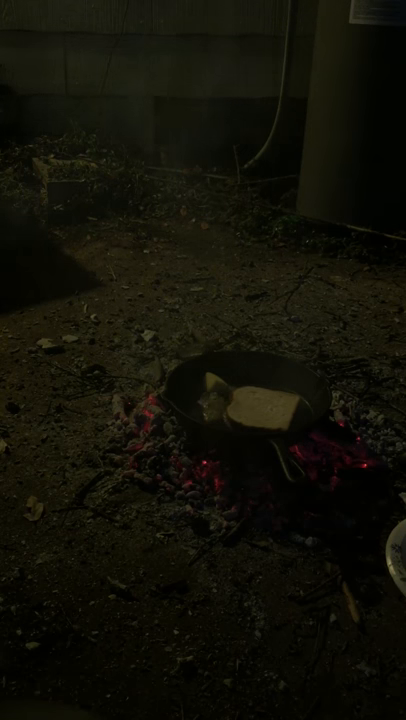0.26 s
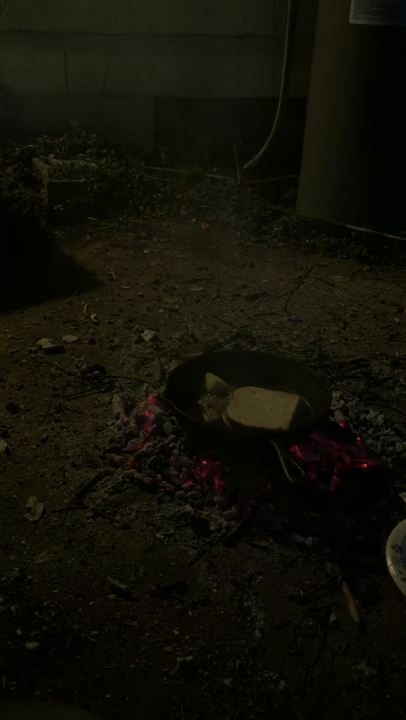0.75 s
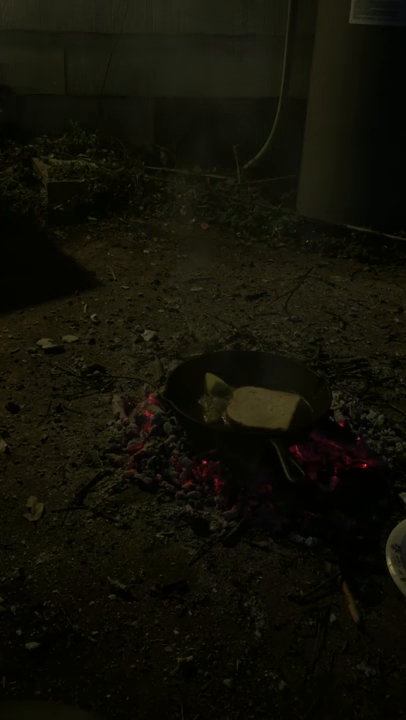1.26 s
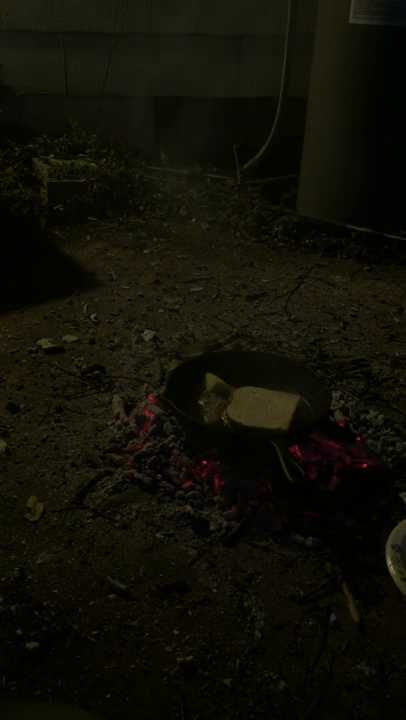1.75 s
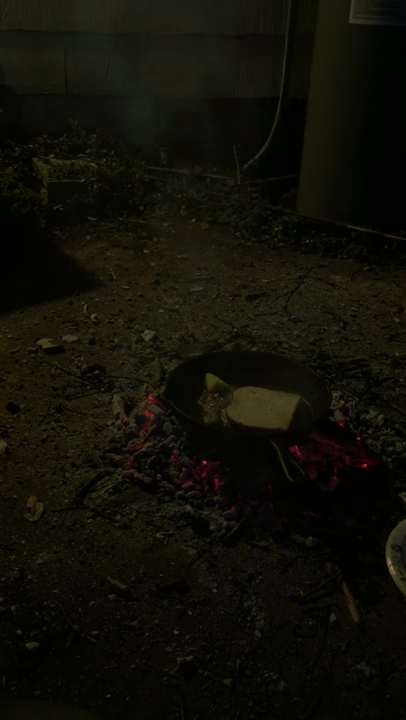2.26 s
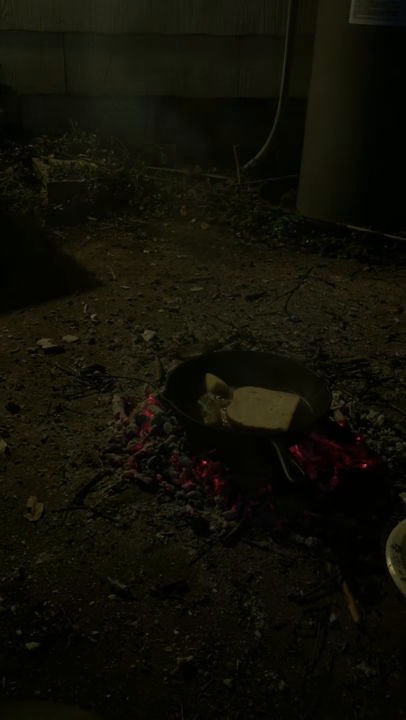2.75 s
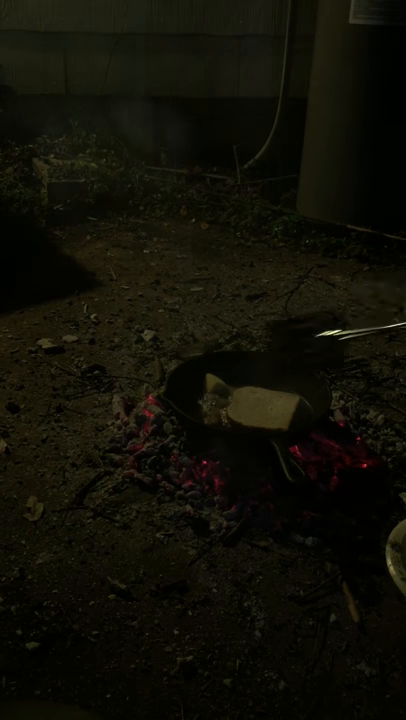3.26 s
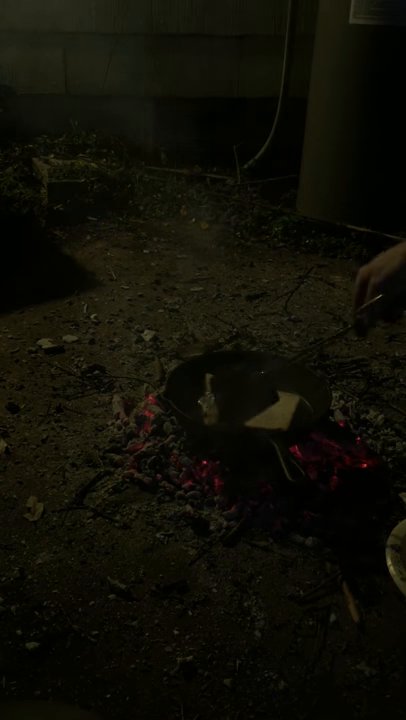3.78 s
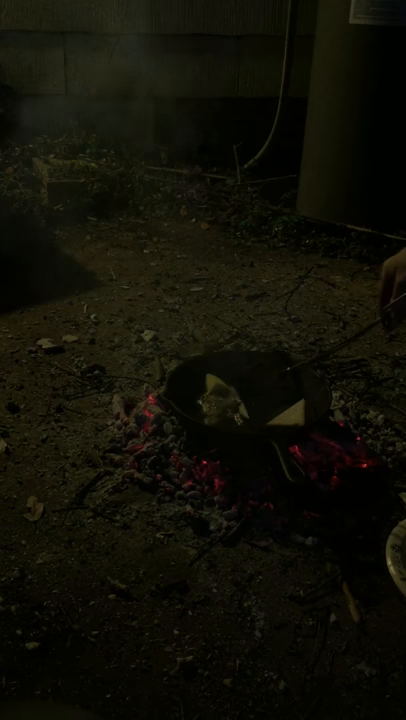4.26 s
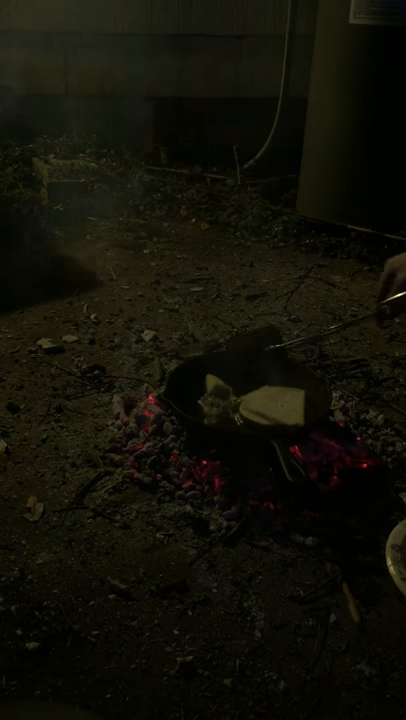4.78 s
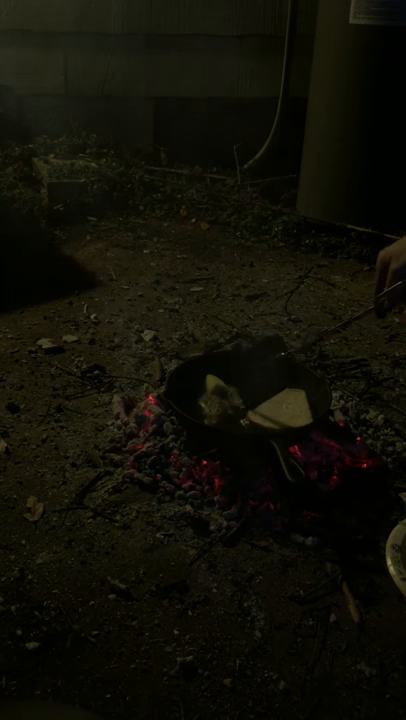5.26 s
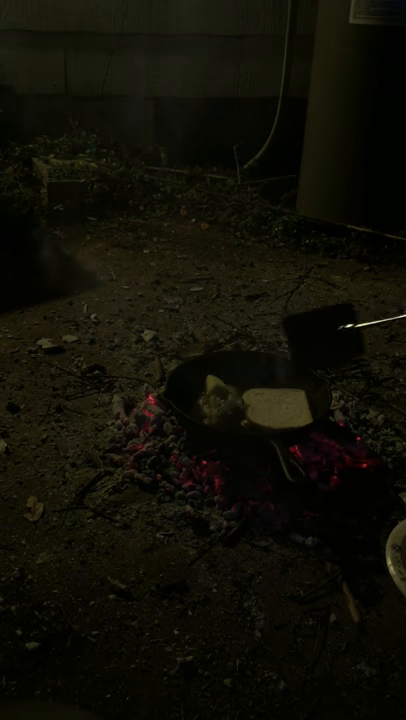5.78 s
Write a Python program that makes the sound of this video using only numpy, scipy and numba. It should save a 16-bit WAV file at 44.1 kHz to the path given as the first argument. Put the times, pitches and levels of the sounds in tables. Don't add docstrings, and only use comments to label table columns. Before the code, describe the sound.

Fat spits and sizzles outdoors at night while gravel shifts underfoot, a dry leaf cracks, then metal taps and scrapes the pan.

```python
import sys
import numpy as np
from scipy import signal
from scipy.fft import rfft, irfft
from scipy.io import wavfile
from scipy.ndimage import uniform_filter1d
from numba import njit

SR = 44100
rng = np.random.default_rng(int(sys.argv[2]) if len(sys.argv) > 2 else 0)


def put_to_file(sound):
    columns = np.atleast_2d(sound).T
    safe = np.clip(columns, -1, 1)
    whole_steps = np.round(safe * 32767)
    wavfile.write(sys.argv[1], SR, whole_steps.astype(np.int16))


def gain_from_decibels(decibels):
    exponent = np.asarray(decibels, float) / 20
    return 10 ** exponent


N = 265923

# start in seconds, peak in dB, pitch in Hz.
SNAPS = [(.272, -25, 8450), (.422, -17.5, 9100), (.5449, -22, 4150), (.9271, -11, 8600),
         (.9632, -19.5, 7740), (1.0582, -16.5, 7640), (1.204, -19, 7140), (1.287, -5, 6960),
         (1.6889, -19.5, 10600), (1.8268, -17, 4000), (2.0116, -21, 4900), (2.0196, -27, 4550),
         (2.0469, -20, 6600), (2.1505, -14, 8700), (2.2352, -16, 8900), (2.2604, -22, 4340),
         (2.3053, -13.5, 8050), (2.3175, -10.5, 5900), (2.3604, -22, 6550), (2.454, -16.5, 8100),
         (2.8943, -14, 7240), (3.127, -20, 7740), (3.4908, -25, 8700), (3.5402, -17.5, 9900),
         (3.5436, -21, 8400), (3.7317, -21.5, 7850), (4.574, -21, 7900), (5.5834, -20.5, 6670),
         (5.838, -15, 9190), (5.873, -23, 12000)]
# start in seconds, peak in dB, pitch in Hz.
POPS = [(.1108, -25.5, 9250), (.2081, -28, 12160), (.839, -20, 6240), (.8927, -27, 9730),
        (.966, -25.5, 11460), (1.0706, -19, 11000), (1.0809, -21, 11770), (1.217, -24, 8300),
        (1.2517, -21, 11500), (1.2768, -18, 8800), (1.2982, -21, 7650), (1.4491, -19.5, 11900),
        (1.5746, -20, 13500), (1.7946, -19, 7240), (2.11, -22, 6600), (2.1456, -24, 8100),
        (2.1805, -22.5, 6600), (2.1855, -24.5, 8800), (2.5533, -23.5, 8100), (2.686, -30, 9900),
        (2.7698, -28, 6300), (2.8634, -24, 6210), (3.2863, -25, 5900), (3.2906, -27, 5060),
        (3.9025, -27, 10000), (4.3179, -26, 10700), (5.1568, -20, 14400), (5.2436, -24.5, 10400),
        (5.7713, -18.5, 7300), (5.7987, -24, 8210)]
# start in seconds, peak in dB, pitch in Hz.
PINGS = [(.1274, -26, 11000), (.2782, -28, 11100), (.4705, -19.5, 9100), (.7415, -28.5, 9200),
         (1.003, -23.5, 9600), (1.0228, -26, 8800), (1.0276, -25, 5840), (1.6454, -32, 8100),
         (2.3227, -23, 9100), (2.4085, -25, 12000), (2.8289, -27, 7750), (2.8763, -25, 6230),
         (2.9467, -24, 10700), (2.9962, -25, 11800), (3.0422, -26, 9400), (3.1136, -22.5, 10000),
         (3.1456, -28, 8900), (3.1966, -23, 8950), (3.2945, -23, 8800), (3.3281, -26.5, 6100),
         (3.3413, -27, 9400), (3.3981, -26, 8800), (3.868, -26, 7440), (4.3229, -30.5, 8700),
         (4.687, -28.5, 8140), (5.0732, -27, 11500), (5.0829, -16.5, 11200), (5.444, -25, 10800),
         (5.5744, -26.5, 9400), (5.7835, -30, 8180)]
# start in seconds, peak in dB, pitch in Hz.
TICKS = [(.0375, -24, 11300), (.122, -29, 9550), (.241, -30, 4470), (.3545, -29, 9510), (.4545, -26, 7300),
         (.7008, -26, 11800), (.8505, -24, 8450), (1.258, -28, 7730), (1.3138, -25, 9980),
         (1.37, -27, 5300), (1.415, -27, 10000), (1.705, -25, 14050), (1.7545, -25.5, 9700),
         (2.1594, -28, 5930), (2.2215, -32, 9500), (2.3866, -24, 10110), (2.485, -27.5, 5130),
         (2.836, -22, 7940), (3.4113, -27, 5300), (3.6493, -26, 4980), (4.5368, -29, 12820),
         (4.554, -26, 8050), (4.6655, -25.5, 8800), (4.8271, -32, 3970), (4.9265, -24, 11500),
         (5.2611, -27, 7100), (5.5001, -28, 9860), (5.531, -27, 10360), (5.691, -22, 12690),
         (5.824, -23, 9720)]
# time in seconds, boil level in dB, fine spray re boil in dB.
BOIL = [(0.0, -60.5, -4), (.34, -57.5, -2), (.67, -64, -25), (1.01, -59.5, -11), (1.34, -55.5, -11),
        (1.68, -62.5, 6.5), (2.01, -56, -22), (2.68, -59.5, -29), (3.02, -55.5, -23), (3.35, -60.5, -10),
        (3.68, -60, -34), (4.1, -63.5, -15), (4.36, -63, 0), (4.62, -60.5, -4.5), (4.8, -62.5, -9),
        (5.08, -62.5, -7), (5.36, -60, 0), (6.03, -61, 2)]
# frequency in Hz, density in dB per Hz.
FIZZ_TONE = [(1200, -10.5), (2200, -7), (5000, 1), (9000, -2), (16000, -11.5)]
# time in seconds, pressure in dB, swell time in seconds,
# loose stones re pressure in dB, grind re pressure in dB.
STEPS = [(.2, -72, 0.23, 4, 13), (.42, -62.5, 0.22, -15, -5), (1.073, -48, 0.047, -7.5, -11),
         (1.23, -51, 0.096, -2.5, -2), (1.344, -43.5, 0.091, -2, -6.5), (1.44, -51.5, 0.042, 0, -12),
         (1.613, -45.5, 0.029, -18, -10), (1.782, -59.5, 0.068, 5, 11.5), (1.88, -46.5, 0.098, -1.5, -2.5),
         (1.95, -43, 0.095, -1.8, -4.5), (2.023, -37.5, 0.068, -6, -4), (2.17, -65.5, 0.17, 3.5, 6.5),
         (2.46, -55, 0.12, -9, -3), (2.55, -64.5, 0.096, 3, -7), (2.82, -56, .05, 2.5, 3.5),
         (2.871, -52, 0.068, 0, 1), (2.93, -55, 0.06, 5.5, -7), (3.17, -63, 0.088, -5, -8),
         (3.3, -59.5, 0.043, -12, -11)]
# start in seconds, peak in dB, pitch in Hz.
STONES = [(0.926, -52.5, 1600), (0.968, -48.5, 1560), (1.487, -48, 2700), (1.512, -46.5, 2820),
          (1.607, -44, 2500), (1.612, -41.5, 640), (1.612, -43, 2700), (1.615, -48, 2500),
          (1.622, -46, 2650), (1.78, -42, 1900), (1.811, -38, 2500), (1.828, -35, 1480), (1.833, -38, 2900),
          (1.937, -32, 1900), (1.938, -34, 3300), (2.021, -29.5, 3100), (2.16, -38.5, 2500),
          (2.262, -44, 1800), (2.794, -39.5, 2550), (2.865, -42.5, 1030), (3.621, -49, 2050),
          (4.573, -52, 2080), (4.894, -43.5, 3030), (5.081, -39, 2210), (5.26, -44.5, 2120)]
# frequency in Hz, density in dB per Hz.
LEAF_TONE = [(500, -36), (700, -25), (900, 6), (1200, -20), (1420, 4.5), (1780, -1.5), (2350, 8.5),
             (3300, -3), (8000, 0.5), (12500, 3), (16000, -6)]
# frequency in Hz, level in dB, 60 dB decay in seconds.
TAP_MODES = [(600, 4.5, 0.12), (770, 4.5, 0.1), (1380, 21, 0.092), (1600, -18, .03), (1800, -27, 0.031),
             (2148, 5.5, 0.23), (3640, -38, .1), (4360, -32, .1)]
# time in seconds, ring level in dB, hiss re ring in dB.
SCRAPE = [
    [(3.906, -43, -7), (3.935, -49.5, -2), (3.962, -42.5, -1.5), (3.99, -49, -2.5), (4.008, -51.5, 5),
     (4.03, -67, -11)],
    [(4.122, -60, -8), (4.135, -49.5, -20), (4.155, -49, -2), (4.185, -56.5, -3), (4.25, -71, -8)],
]
# frequency in Hz, width in Hz, level in dB.
PAN_RINGS = [(1430, 30, -7), (2140, 30, 0), (2445, 30, -3), (2600, 50, -8), (3150, 40, -10), (3750, 60, -8),
             (4290, 90, -10)]
# frequency in Hz, density in dB per Hz.
SCRAPE_TONE = [(240, -56), (400, -28), (1170, -17), (2120, -1), (2980, -6), (3710, -6), (5500, -37),
               (7150, -47), (12100, -120)]
# frequency in Hz, density in dB per Hz.
NIGHT = [(15, -83), (25, -8.5), (76, 0.5), (118, -4.5), (172, -18), (477, -29), (948, -26.5), (1730, -36),
         (2250, -28.5), (3670, -37), (4480, -37), (5000, -38.5), (6500, -37), (11000, -120)]
# frequency in Hz, gain in dB.
PORT = [(3700, -1), (4550, 4), (5600, -3), (7200, 3), (8050, -.5), (9000, 4), (10400, -5), (11600, 2),
        (12600, 1.5), (14400, -4), (15500, 1.5)]

SNAP_CYCLES, POP_CYCLES, PING_CYCLES = 0.64, 1.2, 2.2
LONE_RE_BOIL_DB, CLUSTER_DB, SEETHE_DB = -2.2, 2.5, 2.2
RELEASE_PER_SWELL = 1.085
LEAF_S, LEAF_DB, LEAF_ATTACK_S = 2.711, -29, 0.0029
LEAF_SPENT_S, LEAF_BEND = 0.042, 1.4
TAP_S, TAP_DB = 3.9062, -21.5
RUMBLE_DB, AIR_DB = -51.5, -51.5


def unit(x):
    return x / np.sqrt(np.mean(x ** 2))


def colour(x, points):
    hz, db = np.transpose(points)
    f_hz = np.maximum(np.fft.rfftfreq(N, 1 / SR), 1)
    gain = gain_from_decibels(np.interp(np.log(f_hz), np.log(hz), db))
    return unit(irfft(rfft(x) * gain, N))


def band(x, lo_hz, hi_hz):
    edges_hz = [lo_hz, min(hi_hz, .45 * SR)]
    sos = signal.butter(2, edges_hz, "bandpass", fs=SR, output="sos")
    return unit(signal.sosfilt(sos, x))


def curves(tables):
    t, out = np.arange(N) / SR, 0
    for table in tables:
        s, *columns = np.transpose(table)
        inside = (t >= s[0]) & (t < s[-1])
        out = out + inside * np.array([np.interp(t, s, c) for c in columns] + [t * 0 + 1])
    silence_db = 200 * (1 - out[-1])
    return np.vstack([out[:1] - silence_db, out[1:-1]])


@njit
def grains(s, size, hz, cycles, swell):
    y = np.zeros(N)
    for k in range(len(s)):
        i = int(s[k] * SR)
        p = np.exp((2j * np.pi - 1 / cycles[k]) * hz[k] / SR)
        q = np.exp(-hz[k] / SR / swell)
        z, lack = size[k] * p ** (i + 1 - s[k] * SR), q
        while abs(z) > .003 * abs(size[k]) and i < N - 1:
            i += 1
            y[i] += z.imag * (1 - lack) ** 2
            z *= p
            lack *= q
    return y


def scatter(count, spread_db, lo_hz, hi_hz, cycles):
    u = rng.random((count, 4)).T
    size = gain_from_decibels(-spread_db * np.log(1 - .99 * u[1])) * np.sign(u[3] - .5)
    hz = lo_hz * (hi_hz / lo_hz) ** u[2]
    ring_cycles = cycles * (.3 + 2.8 * abs(u[3] - .5))
    return unit(grains(u[0] * N / SR, size, hz, ring_cycles, .6))


def walk(rate_hz):
    k = int(SR / rate_hz)
    held = np.repeat(rng.standard_normal(N // k + 1), k)
    return 1.2 * uniform_filter1d(held, k)[:N]


def resonate(x, hz, t60_s):
    p = np.exp(2j * np.pi * hz / SR - np.log(1000) / (t60_s * SR))
    return signal.lfilter([1], [1, -p], x).imag


def yard(near):
    t = np.arange(2000) / SR
    tail = rng.standard_normal(len(t)) * gain_from_decibels(-60 * t / 0.011) * (t > .0011)
    return near + gain_from_decibels(-18.5) * signal.fftconvolve(near, tail)[:N]


def butter():
    kinds = (SNAPS, SNAP_CYCLES), (POPS, POP_CYCLES), (PINGS, PING_CYCLES), (TICKS, POP_CYCLES)
    s, db, hz, cycles = np.transpose([(*row, ring) for table, ring in kinds for row in table])
    sign = np.sign(rng.standard_normal(len(s)))
    pops = grains(s - .00015, sign * gain_from_decibels(db + 3.5), hz, cycles, .5)
    boil_db, spray_db = curves([BOIL])

    small = scatter(count=7000, spread_db=2.5, lo_hz=2500, hi_hz=13000, cycles=2.0)
    hiss = gain_from_decibels(1.5 * walk(25)) * rng.standard_normal(N)
    spectrum = rfft(small + gain_from_decibels(-7) * hiss)
    white = irfft(spectrum / uniform_filter1d(abs(spectrum), size=9000), N)
    carpet = colour(white, FIZZ_TONE)

    lone = scatter(count=520, spread_db=2.0, lo_hz=7200, hi_hz=12500, cycles=4.0)
    lone = lone * gain_from_decibels(LONE_RE_BOIL_DB + CLUSTER_DB * walk(13))

    mist = scatter(count=3000, spread_db=3.5, lo_hz=10000, hi_hz=16000, cycles=3.0)
    spray = band(mist + gain_from_decibels(-9) * hiss, 10500, 16500)
    fine = gain_from_decibels(SEETHE_DB * walk(18)) * carpet + gain_from_decibels(spray_db + CLUSTER_DB * walk(20)) * spray
    return yard(pops + gain_from_decibels(boil_db) * lone) + gain_from_decibels(boil_db - .2) * fine


def feet():
    s, db, swell_s, stones_db, grind_db = np.transpose(STEPS)[:, :, None]
    late = (np.arange(N) / SR - s) / swell_s
    power = gain_from_decibels(db - 20 * np.maximum(-late, late / RELEASE_PER_SWELL) ** 1.52) ** 2

    def press(gain_db):
        return np.sqrt((power * gain_from_decibels(gain_db) ** 2).sum(axis=0))

    sole = band(scatter(count=3000, spread_db=-3.0, lo_hz=175, hi_hz=771, cycles=1.6), 205, 880)
    stones = band(scatter(count=5000, spread_db=0.3, lo_hz=618, hi_hz=1850, cycles=1.7), 710, 1690)
    grit = band(scatter(count=8000, spread_db=2.0, lo_hz=1600, hi_hz=3450, cycles=0.65), 1660, 4900)
    dust = gain_from_decibels(-8.5) * band(rng.standard_normal(N), 2800, 10600)
    s, db, hz = np.transpose(STONES)
    knocks = grains(s, gain_from_decibels(db + 4.5), hz, np.full(len(s), 3.0), 0.12)
    return (press(0) * sole + press(stones_db) * stones
            + press(grind_db) * (grit + dust) + knocks)


def leaf():
    clicks = rng.standard_normal(N) * gain_from_decibels(1.5 * walk(900))
    late_s = np.arange(N) / SR - LEAF_S
    attack = np.clip(late_s / LEAF_ATTACK_S, 0, 1) ** 2
    decay_db = 20 * (np.maximum(late_s, 0) / LEAF_SPENT_S) ** LEAF_BEND
    return attack * gain_from_decibels(LEAF_DB - decay_db) * colour(clicks, LEAF_TONE)


def spatula():
    blow = grains(np.array([TAP_S]), np.array([1.]), np.array([2500.]), np.array([.8]), 0.72)
    tap = sum(gain_from_decibels(db) * resonate(blow, hz, t60_s) for hz, db, t60_s in TAP_MODES)

    ring_db, hiss_db = curves(SCRAPE)
    rough = unit(rng.standard_normal(N) * gain_from_decibels(2.5 * walk(300)))
    modes = 0
    for hz, width_hz, db in PAN_RINGS:
        level = gain_from_decibels(db) * np.sqrt(4 * np.pi * width_hz / SR)
        modes = modes + level * resonate(gain_from_decibels(ring_db) * rough, hz, 2.2 / width_hz)
    slide = gain_from_decibels(1.0) * colour(rough, SCRAPE_TONE) + gain_from_decibels(hiss_db) * band(rough, 4800, 12000)
    return gain_from_decibels(TAP_DB) * tap / abs(tap).max() + modes + gain_from_decibels(ring_db) * slide


def night():
    air = colour(rng.standard_normal(N), NIGHT)
    swell_db = .6 * walk(6)
    low = signal.sosfiltfilt(signal.butter(2, 170, fs=SR, output="sos"), air)
    return gain_from_decibels(RUMBLE_DB + swell_db) * unit(low) + gain_from_decibels(AIR_DB + 0.09 * walk(2.72)) * (air - low)


def port(x):
    hz, db = np.transpose(PORT)
    log_gain = np.log(gain_from_decibels(np.interp(np.fft.rfftfreq(512, 1 / SR), hz, db)))
    fold = np.r_[1, np.full(255, 2), 1, np.zeros(255)]
    cepstrum = irfft(log_gain) * fold
    return signal.lfilter(irfft(np.exp(rfft(cepstrum))), 1, x)


def scene():
    return (butter() + feet() + leaf() + spatula() + night())[None]


def top_cut(x):
    return signal.sosfilt(signal.butter(12, 17000, fs=SR, output="sos"), x)


def record(dry):
    low_pass = signal.ellip(10, .3, 38, 15850, fs=SR, output="sos")
    high_pass = signal.butter(4, 42, "highpass", fs=SR, output="sos")
    cut = signal.sosfilt(low_pass, port(dry))
    return top_cut(signal.sosfilt(high_pass, cut))


dry = scene()
out = record(dry)
put_to_file(out)
```